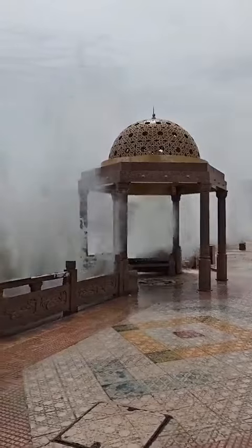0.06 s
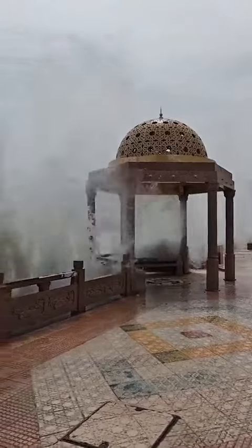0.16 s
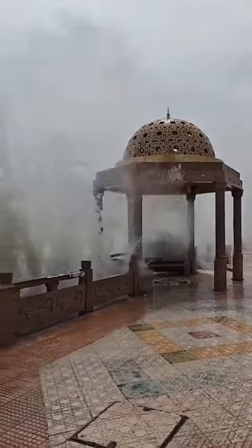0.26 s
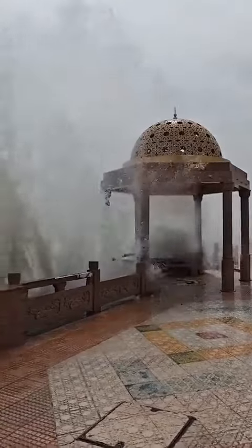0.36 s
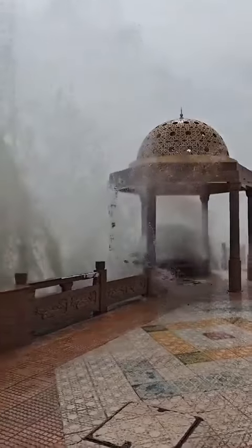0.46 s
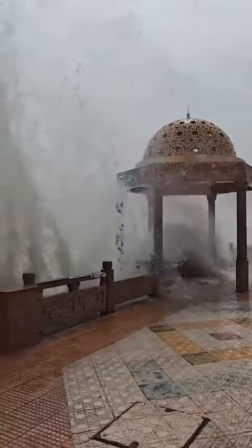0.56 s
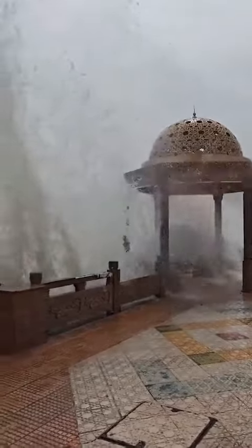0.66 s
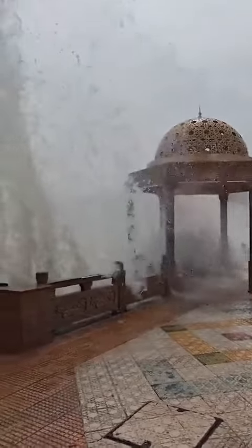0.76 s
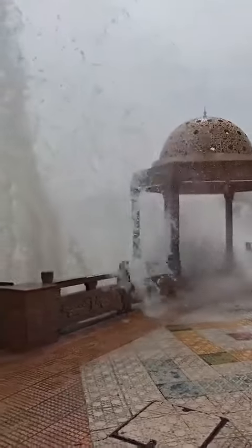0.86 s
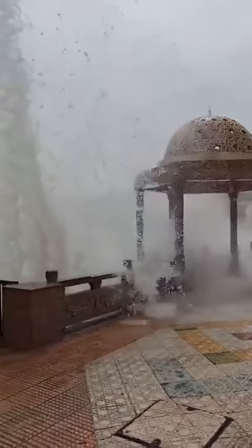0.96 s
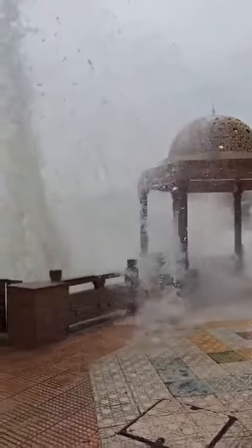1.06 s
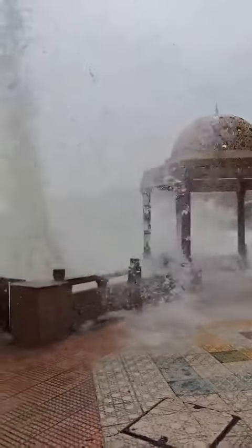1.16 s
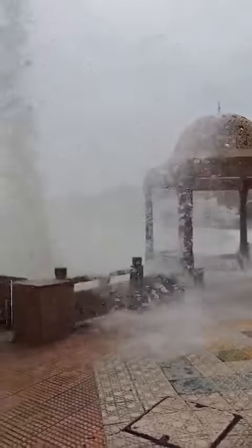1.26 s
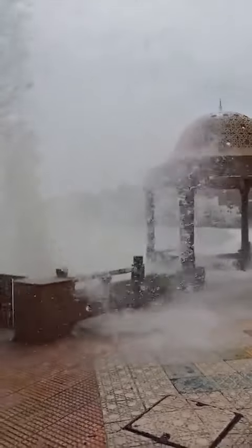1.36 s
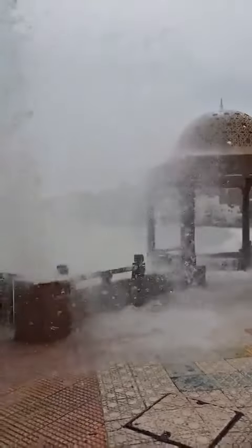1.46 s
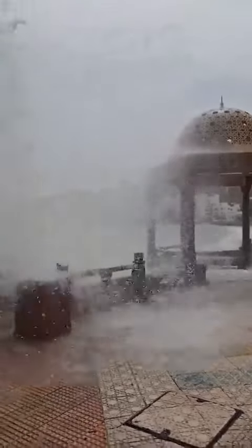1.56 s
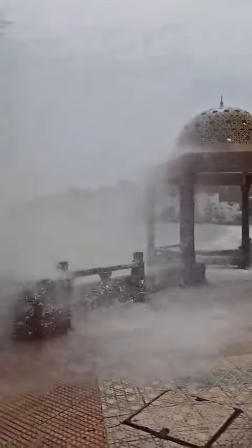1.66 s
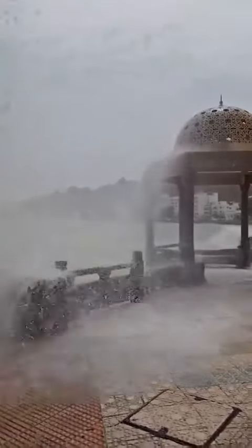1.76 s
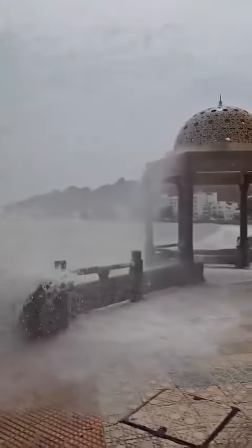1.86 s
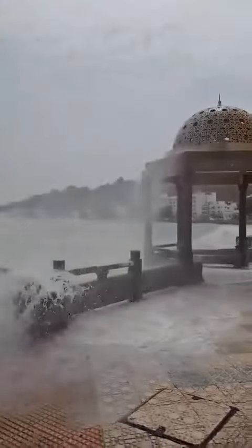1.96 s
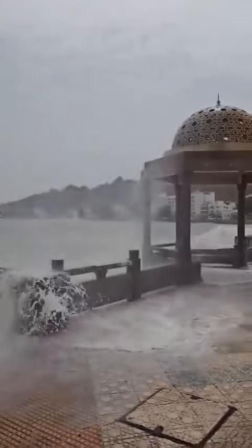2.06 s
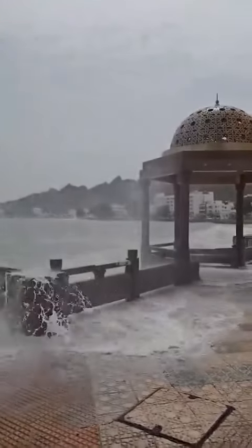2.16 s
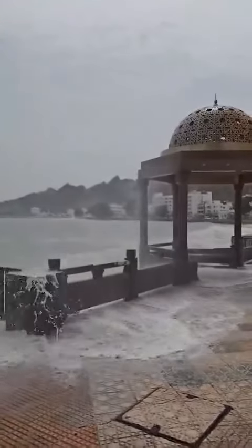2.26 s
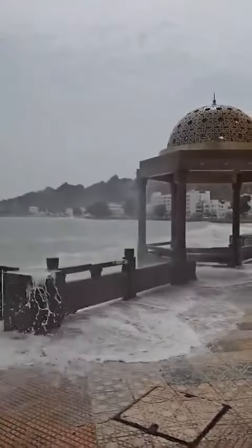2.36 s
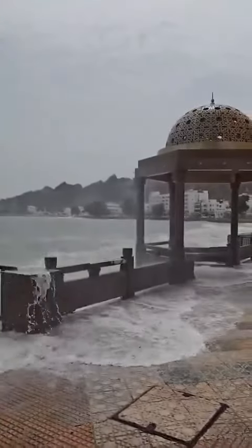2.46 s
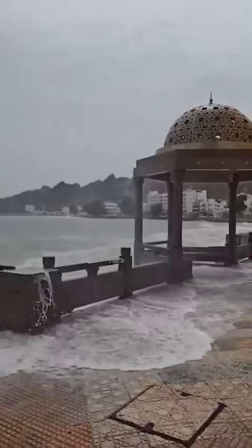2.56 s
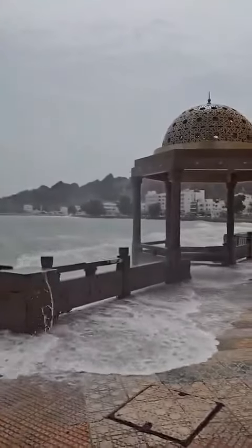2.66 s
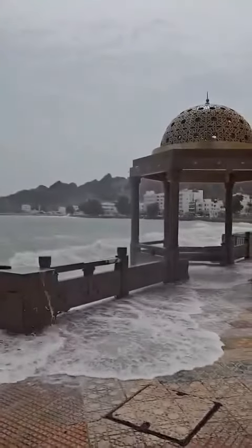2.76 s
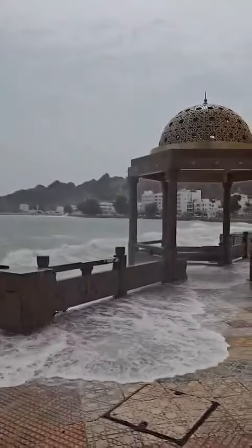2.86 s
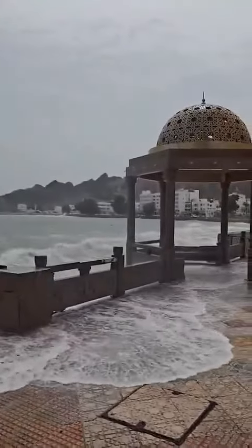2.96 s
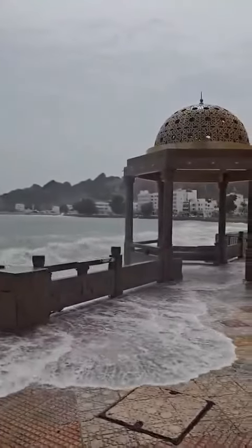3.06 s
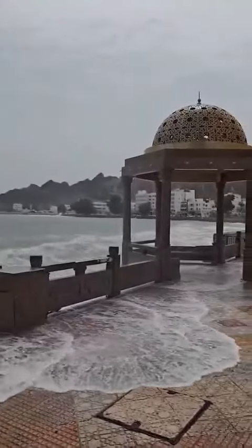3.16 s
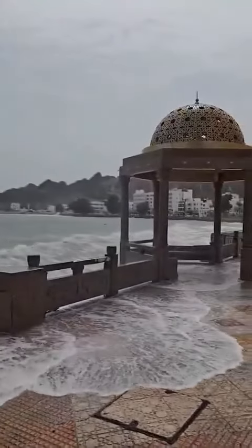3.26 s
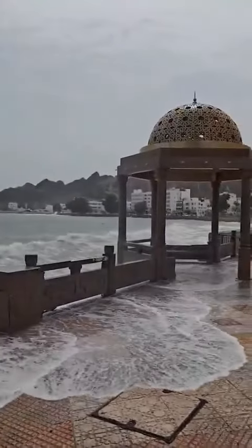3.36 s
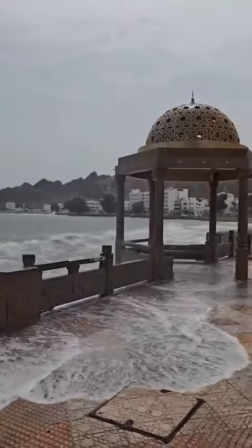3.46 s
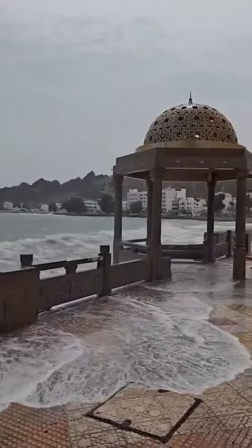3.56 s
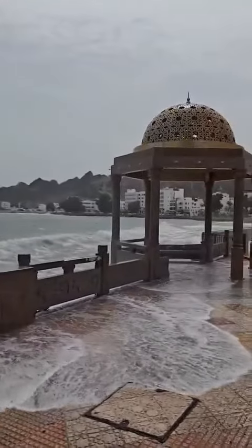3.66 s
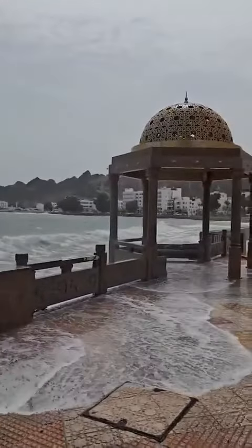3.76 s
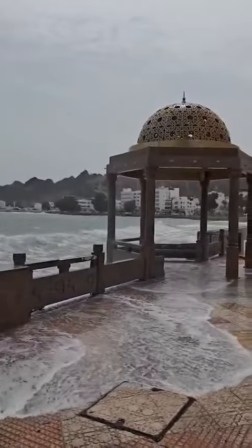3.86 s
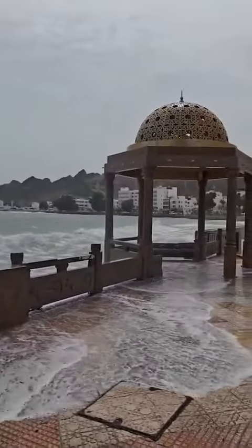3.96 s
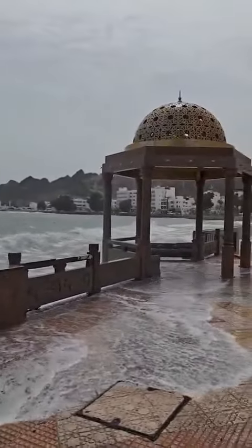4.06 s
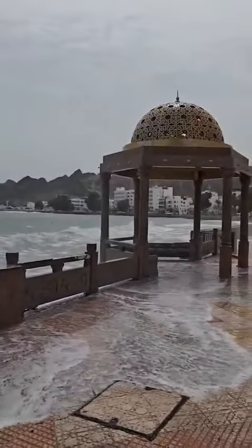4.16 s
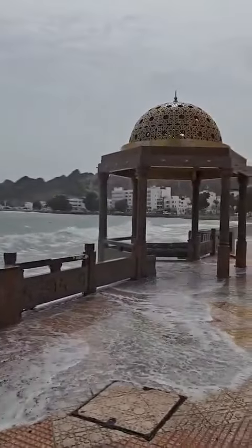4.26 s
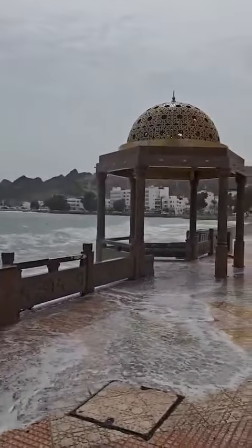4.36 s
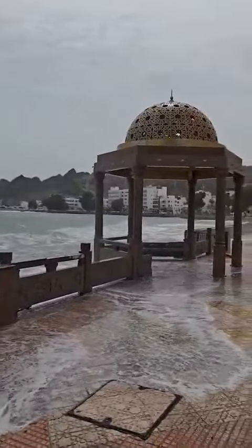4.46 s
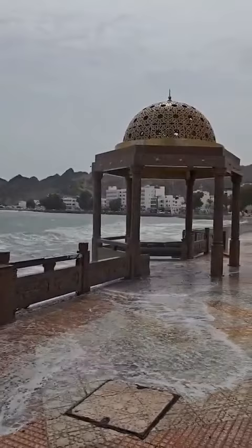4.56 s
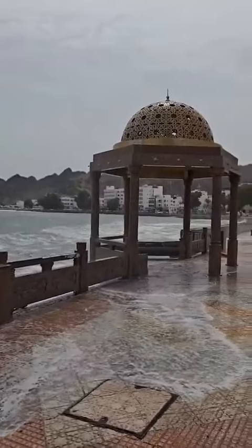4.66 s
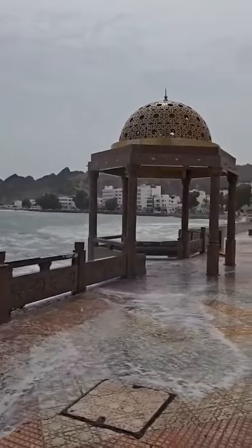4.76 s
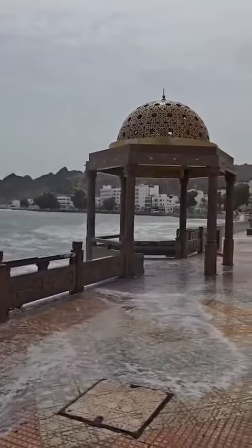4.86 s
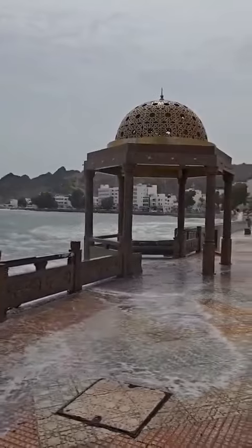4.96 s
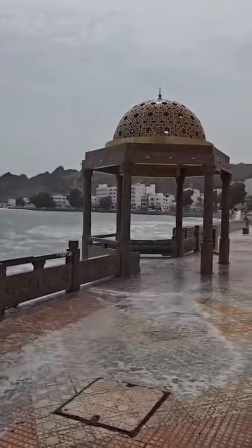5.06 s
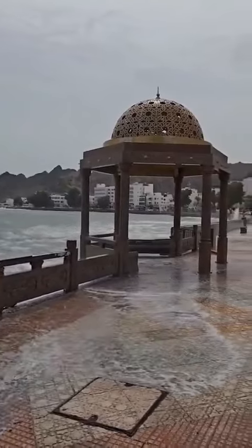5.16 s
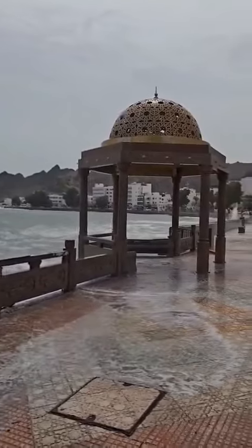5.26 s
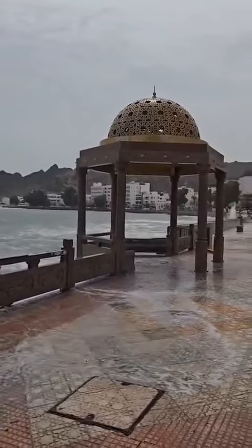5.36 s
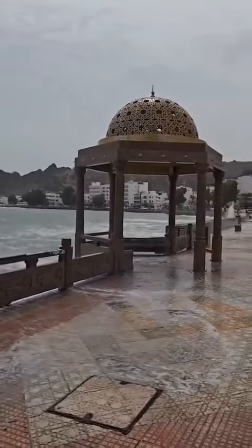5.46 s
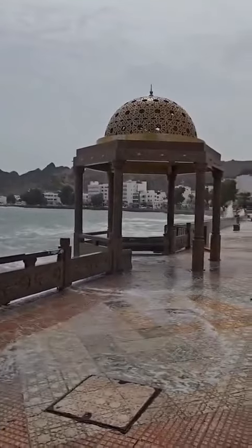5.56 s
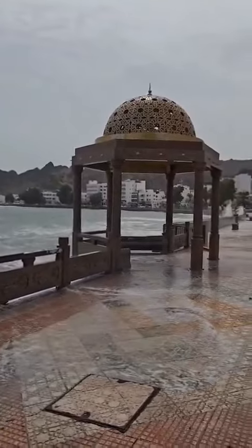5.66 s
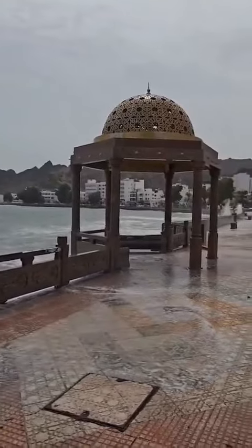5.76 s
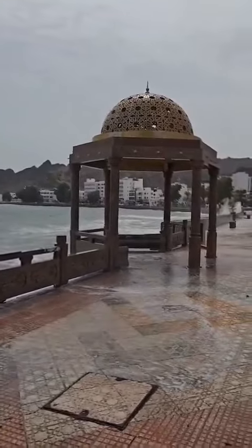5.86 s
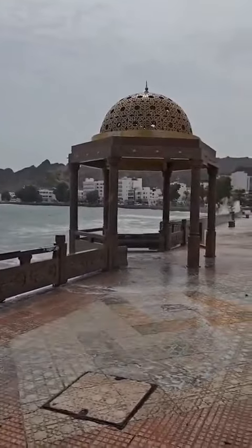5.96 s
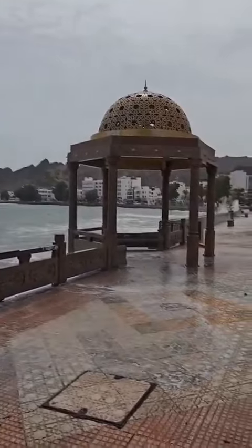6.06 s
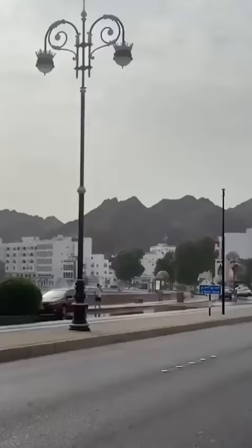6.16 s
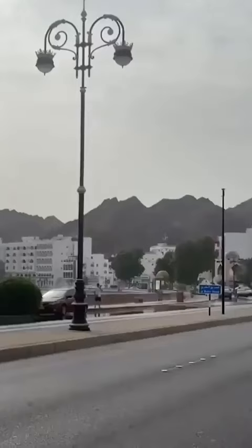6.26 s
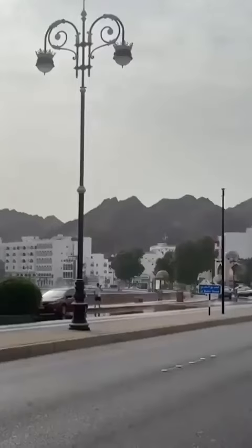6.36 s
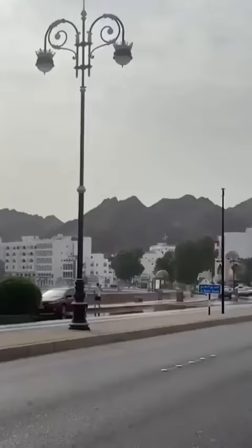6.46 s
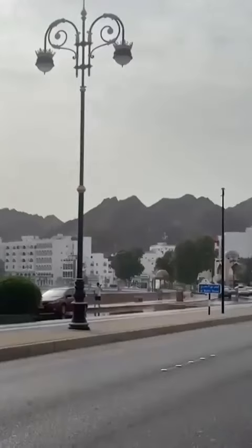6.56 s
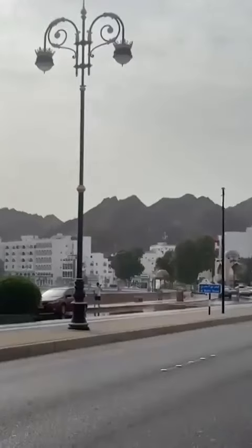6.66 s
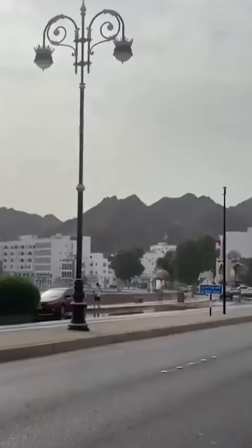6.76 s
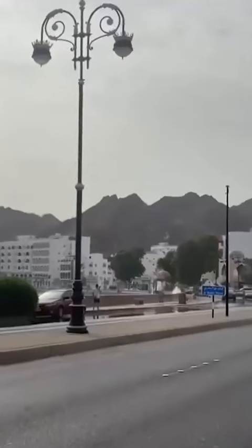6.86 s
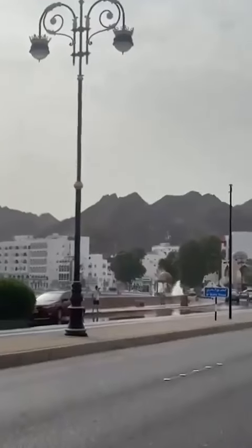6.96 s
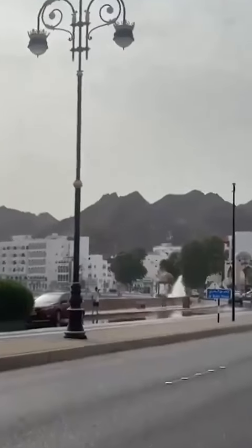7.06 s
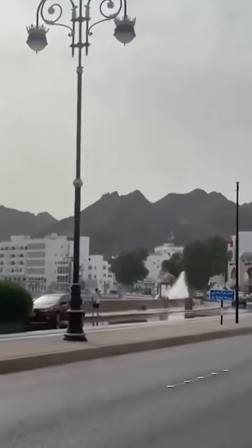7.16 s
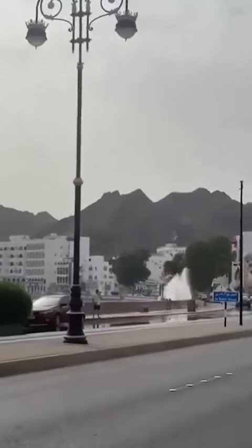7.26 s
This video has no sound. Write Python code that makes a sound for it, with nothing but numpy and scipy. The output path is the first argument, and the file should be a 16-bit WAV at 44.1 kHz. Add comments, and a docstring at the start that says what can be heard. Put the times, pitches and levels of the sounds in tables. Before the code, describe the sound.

A phone stands close to a seawall on a windy promenade. At 0 s a wave is already bursting upward in a broad roar that fades a little until about 0.8 s. Then the water falls: a dense, bright crash with hollow low thuds swells from 0.9 s, heavy water first, fine spray peaking near 2 s, with a wet slap around 1.5 s and others at 2.6 and 2.9 s. Hard wind buffets thump the microphone, strongest from 0.8 to 3.1 s, with a deep hum under the gusts. After 3 s the crash falls off quickly to a softer hiss of foam, bubbling and trickling over paving. A gust thumps at 4.4 s; small glugs come at 3.8 s and between 5 and 6.1 s as the wash slowly swells. Near 6.2 s it cuts to silence. From 6.4 s a dull road rumble continues with faint, distant surf and tyres, swelling briefly around 7.1 s.

```python
"""On a promenade a storm wave bursts over the seawall: it roars, spray rains on the paving, foam fizzes and gurgles.
Water is coloured noise, random impacts and ringing bubbles, with separate thuds, slaps and glugs on top.
Wind is low coloured noise swelling in gusts, with hard buffets of damped tone; a low hum swells with each gust.
After a moment of silence comes the coast road: two dull bands of noise for rumble and for distant surf and tyres."""
import sys
import numpy as np
from scipy import signal
from scipy.fft import rfft, irfft, next_fast_len
from scipy.io import wavfile
from scipy.ndimage import uniform_filter1d

SR = 44100
rng = np.random.default_rng(int(sys.argv[2]) if len(sys.argv) > 2 else 0)


def unload_wav(signal):
    """Save mono or channel-first audio to the path in sys.argv[1] as 16-bit WAV at rate SR, clipped to [-1, 1]."""
    wavfile.write(
        sys.argv[1],
        SR,
        np.round(np.clip(np.atleast_2d(signal).T, -1, 1) * 32767).astype(np.int16),
    )


N = 322767
TIME = np.arange(N) / SR


def undb(db):
    """Amplitude ratio: 20 dB is a factor of ten."""
    return 10 ** (np.asarray(db) / 20)


def curves(table):
    """Linear interpolation in time of each column of a table of (t/s, ..) rows."""
    s, *columns = np.transpose(table)
    return [np.interp(TIME, s, column) for column in columns]


def colour(points, hz):
    """Spectral envelope: (f/Hz, level/dB) points joined on a logarithmic frequency axis."""
    f, db = np.transpose(points)
    return undb(np.interp(np.log(hz), np.log(f), db))


def shape(x, gain):
    """Zero-phase linear filtering: the spectrum is multiplied by a gain that depends on frequency."""
    size = next_fast_len(N, real=True)
    hz = np.maximum(np.arange(size // 2 + 1) * SR / size, 1)
    return irfft(rfft(x, size) * gain(hz), size)[..., :N]


def split(x, hz):
    """Complementary crossover: a steep low band and its remainder add up to the input."""
    low = shape(x, lambda f: 1 / (1 + (f / hz) ** 8))
    return low, x - low


def unit(x):
    """Normalisation: the middle of a stereo pair gets rms 1."""
    return x / np.std(x.mean(axis=0))


def spread(pair, spectrum, width):
    """Mid-side synthesis: two unrelated signals become the coloured middle and side of a stereo pair."""
    mid = shape(pair[0], lambda f: colour(spectrum, f))
    side = shape(pair[1], lambda f: colour(spectrum, f) * colour(width, f))
    return np.array([mid + side, mid - side])


def walk(rate):
    """Random modulation: normal values held for 1 / rate s and smoothed twice, scaled to deviation 1."""
    hold = max(int(SR / rate), 1)
    steps = np.repeat(rng.standard_normal(N // hold + 1), hold)
    y = uniform_filter1d(uniform_filter1d(steps, hold), hold)[:N]
    return y / np.std(y)


def bell(s, half_length):
    """Gaussian envelope, down to 1/e at half_length from its centre."""
    return np.exp(-np.minimum(((TIME - s) / half_length) ** 2, 30))


def arch(s, db, drop_db):
    """Parabolic level in decibels, drop_db below the peak one second to either side."""
    return undb(db - drop_db * (TIME - s) ** 2)


def impacts(rate, scatter_db):
    """Shot noise: drops land at random, most small and a few large, in two unrelated streams."""
    sizes = undb(scatter_db * np.minimum(rng.exponential(size=(2, N)), 5))
    landings = rng.random((2, N)) < rate / SR
    x = landings * sizes * rng.choice([-1, 1], (2, N))
    return x / np.std(x)


def bubbles(low_hz, high_hz, cycles, rise, scatter_db, count):
    """Bubble resonance: trapped air rings as a damped sine, its pitch rising near the surface."""
    out = np.zeros((2, N))
    for when, pitch, size, place in rng.random((count, 4)):
        hz = low_hz * (high_hz / low_hz) ** pitch
        start = int(when * N)
        # age runs from 0 to 1 over the ring, which decays by 40 dB
        age = np.arange(min(int(cycles * SR / hz), N - start)) * hz / SR / cycles
        ring = np.sin(2 * np.pi * cycles * age * (1 + rise * age / 2)) * np.exp(-np.log(100) * age)
        ring *= undb(-scatter_db * np.log(max(size, .02))) * hz / high_hz
        pan = [np.cos(2 * np.pi * place), np.sin(2 * np.pi * place)]
        out[:, start:start + len(age)] += np.outer(pan, ring)
    return out / np.std(out)


# rows of the three level tables: roar of the mass, splashing, fine spray
# burst dying away: (level at 0 s/dB, fade/(dB per s))
BURST_LEVELS = [(-24, 11), (-21, 13.5), (-27.5, 13.5)]
# downpour, heavy water first and spray last:
# (peak t/s, peak level/dB, drop 1 s from peak/dB, attack/(dB per s), release/(dB per s))
DOWNPOUR_LEVELS = [(1.15, -22.5, 1.2, 30.5, 20), (1.76, -18, 3, 33.5, 24.5), (2.0, -19, 5.5, 25, 21)]
# foam sheet hissing past while the sea builds again: (peak t/s, peak level/dB, drop 1 s from peak/dB)
WASH_LEVELS = [(6.9, -29, 0.29), (2.86, -30.5, 0.38), (3.55, -36, 0.87)]
DOWNPOUR_START_S, DOWNPOUR_END_S = 0.83, 3.034
DOWNPOUR_EASE_S = 0.051  # the last water does not all land at once


def water_levels():
    """Power addition of unrelated sources: burst, downpour and foam set the gains of roar, splash and spray."""
    early = np.maximum(DOWNPOUR_START_S - TIME, 0)
    late = DOWNPOUR_EASE_S * np.logaddexp((TIME - DOWNPOUR_END_S) / DOWNPOUR_EASE_S, 0)
    flooded = np.clip((TIME - DOWNPOUR_START_S) / (DOWNPOUR_END_S - DOWNPOUR_START_S), 0, 1) ** 2
    burst = np.array([undb(db - fade * TIME) for db, fade in BURST_LEVELS])
    downpour = np.array([arch(s, db, drop) * undb(-attack * early - release * late)
                         for s, db, drop, attack, release in DOWNPOUR_LEVELS])
    wash = flooded * np.array([arch(*voice) for voice in WASH_LEVELS])
    return np.sqrt(burst ** 2 + downpour ** 2 + wash ** 2)


ECHO_SHIFT_HZ = 2.5  # how fast the echo paths change


def reflections(x, share_db, fade_s, count):
    """Comb interference: early echoes off close surfaces ripple the treble, shifting as the microphone moves."""
    age = TIME[:int(.04 * SR)]
    echoes = rng.standard_normal((count, len(age))) * np.exp(-age / fade_s) * (age > .002)
    echoes *= undb(share_db) / np.linalg.norm(echoes, axis=1, keepdims=True)
    paths = np.array([walk(ECHO_SHIFT_HZ) for _ in echoes])
    paths /= np.linalg.norm(paths, axis=0)  # constant total power
    _, treble = split(x, 600)
    for path, echo in zip(paths, echoes):
        x = x + path * signal.oaconvolve(treble, echo[None], axes=1)[:, :N]
    return x


# brief dips in level within given bands: (t/s, depth/dB, half length/s, lowest f/Hz, highest f/Hz)
BAND_DIPS = [(1.87, 5.5, 0.067, 80, 300), (2.356, 3.5, 0.041, 300, 14000), (3.797, 1.5, 0.052, 700, 9200),
             (5.23, 3, 0.12, 4500, 14000)]
PATCH_DB, PATCH_RATE_HZ = 0.82, 22  # flicker of each band
SURGE_DB, SURGE_RATE_HZ = 0.77, 6  # its slower swells


def patches(x):
    """Independent band modulation: water lands in patches of every size, so each half octave flickers alone."""
    out, octaves = 0, np.arange(0, 7.1, .5)
    for k, hz in enumerate(100 * 2 ** octaves):
        # triangular bands, which sum to the whole
        band = shape(x, lambda f: np.interp(np.log2(f / 100), octaves, np.arange(len(octaves)) == k))
        db = PATCH_DB * walk(PATCH_RATE_HZ) + SURGE_DB * walk(SURGE_RATE_HZ)
        for s, depth, half_length, low, high in BAND_DIPS:
            if low < hz < high:
                db = db - depth * bell(s, half_length)
        out = out + band * undb(db)
    return out


# spectra of the rising burst, the falling wave and the foam sheet: (f/Hz, relative level per Hz/dB)
BURST = [(30, -31), (70, -12), (100, -6.5), (118, -8.5), (188, 1), (241, -8.5), (272, -3.5), (362, -9.5),
         (401, -3.5), (568, -12), (854, -6.5), (1860, -10), (2100, -9.5), (4290, -14), (11400, -26),
         (13200, -33)]
CRASH = [(71, -14.5), (120, -8), (192, 1.5), (321, -2), (423, -2), (614, -8.5), (910, -4), (1320, -5.5),
         (2120, -5), (2680, -8.5), (4480, -12), (7320, -16), (7920, -18), (12400, -20.5), (13200, -21.5)]
WASH = [(71, -15.5), (120, -10), (174, -1), (280, -3.5), (448, -6), (546, -9.5), (705, -6.5), (809, -4.5),
        (1400, -4), (2080, -7.5), (2480, -11.5), (3080, -11), (8730, -21.5), (12400, -24.5), (13200, -29.5)]
# stereo width of the water and of the foam sheet: (f/Hz, side minus mid level/dB)
WATER_WIDTH = [(110, -2.5), (160, -12), (230, -9), (300, -15), (410, -14.5), (560, -6), (650, -3.5),
               (880, -7), (1500, -1.5), (2450, -3.5), (3900, 1), (7300, -.3), (9000, -4.5), (13000, 0)]
WASH_WIDTH = [(110, -2), (170, -8), (280, -16), (460, -10.5), (600, -6), (810, -10), (1300, -6), (1700, -4),
              (4700, 0), (7400, -0.5), (9000, -6.5), (13000, 1)]
# the two ports colour the water a little differently: (f/Hz, left minus right level/dB)
PORT_BALANCE = [(110, -1), (230, -1.3), (450, 1.5), (1000, -1.5), (1400, 0.2), (1900, -2.5), (2900, 0.7),
                (5000, 0.5), (7500, 1), (11000, -0.4)]


def wave():
    """Superposition: countless drops and bubbles merge into noise that bursts up, lands in clumps and drains."""
    roar_gain, splash_gain, spray_gain = water_levels()
    drops = impacts(rate=5000, scatter_db=3.0)
    foam = bubbles(low_hz=596.4, high_hz=9190, cycles=57, rise=0.18, scatter_db=2.0, count=6000)
    gurgle = bubbles(low_hz=169.0, high_hz=1580, cycles=12.2, rise=0.19, scatter_db=-1.0, count=1200)
    trickle = bubbles(low_hz=915, high_hz=5340, cycles=30, rise=0.2, scatter_db=1.5, count=700)
    noise = rng.standard_normal((2, N))
    heavy = noise + undb(-5.5) * drops + undb(-13.5) * foam + undb(-22.0) * gurgle
    shallow = noise + undb(-4.0) * drops + undb(-13.0) * foam + undb(-22.0) * gurgle + undb(-17.0) * trickle
    rising = unit(spread(heavy, BURST, WATER_WIDTH))
    falling = unit(spread(heavy, CRASH, WATER_WIDTH))
    draining = unit(spread(shallow, WASH, WASH_WIDTH))
    toppled = np.interp(TIME, [.45, .95], [0, 1])
    landed = np.interp(TIME, [3., 3.4], [0, 1])
    water = (1 - toppled) * rising + (toppled - landed) * falling + landed * draining
    roar, rest = split(reflections(water, share_db=-11, fade_s=.014, count=4), 700)
    splash, spray = split(rest, 3500)
    # a clump of falling water lifts splash and spray together
    clumps = 0.35 * walk(32)
    roar = unit(roar) * roar_gain * undb(0.8 * walk(20))
    splash = unit(splash) * splash_gain * undb(clumps + 0.4 * walk(60))
    spray = unit(spray) * spray_gain * undb(clumps + 0.35 * walk(90))
    rush = patches(roar + splash + spray)
    # half of the balance to each port, in opposite senses
    return shape(rush, lambda f: colour(PORT_BALANCE, f) ** np.array([[.5], [-.5]]))


# spectrum of the wind's eddies: (f/Hz, relative level per Hz/dB)
EDDY = [(12, -4.5), (25, -1), (55, 5), (85, 0), (130, -7), (250, -24), (600, -50)]
# stereo width of the wind: (f/Hz, side minus mid level/dB)
WIND_WIDTH = [(30, -4), (90, -1.5), (250, -10.5)]


def eddies():
    """Turbulent pressure at the microphone ports: low noise, its slow swings evened out."""
    x = spread(rng.standard_normal((2, N)), EDDY, WIND_WIDTH)
    return x / np.sqrt(uniform_filter1d(np.mean(x ** 2, axis=0), int(.06 * SR)))


# gusts on the microphone, which also drive the hum:
# (peak t/s, half length/s, relative rumble level/dB, relative hum level/dB)
GUSTS = [(.81, .04, -44, -27), (.895, 0.052, -31, -17), (1.18, 0.07, -43, -29), (1.74, 0.13, -36.5, -35),
         (2.157, 0.14, -35, -22.5), (2.335, 0.061, -25.5, -19), (2.62, 0.22, -30.5, -31.5),
         (2.87, 0.11, -28.5, -16.5), (3.06, 0.093, -32.5, -22), (3.28, .04, -48, -32),
         (3.69, .05, -53, -29.5), (3.905, 0.09, -46, -28.5), (4.228, .025, -55, -29),
         (4.365, 0.054, -33, -23), (5.103, 0.5, -40.5, -30.5), (5.998, 0.33, -40.5, -29.5)]
# spectrum of the flutter: (f/Hz, relative level per Hz/dB)
FLUTTER = [(40, -15), (110, 2.5), (170, 1), (260, -9.5), (500, -32), (1200, -53.5)]
BREEZE_DB = -49.5  # on the scale of the gusts' rumble
GUST_FLUTTER_DB = -4.5  # flutter relative to the gusts' rumble column
BUFFET_SEAWARD_DB = 4.5  # extra left minus right level of buffets and flutter


def wind():
    """Amplitude modulation by the flow: gusts rumble and flutter over a breeze, with short hard buffets."""
    gusts = sum(undb(db) * bell(s, half_length) for s, half_length, db, _ in GUSTS)
    rumble = eddies() * (undb(BREEZE_DB) + gusts) * undb(7.0 + 1.4 * walk(12))
    thumps, strength = buffets()
    # hard wind tears off smaller eddies, which flutter higher up
    flutter = unit(spread(rng.standard_normal((2, N)), FLUTTER, WIND_WIDTH))
    hard = thumps + flutter * (strength + undb(GUST_FLUTTER_DB) * gusts)
    return rumble + hard * undb([[BUFFET_SEAWARD_DB / 2], [-BUFFET_SEAWARD_DB / 2]])


HUM_HZ, HUM_LAG_S = 44.2, .01
HUM_REST_DB = -43  # on the scale of the gusts' hum column
HUM_SWAY_RAD = 0.31  # the phase wanders this far at each port, in opposite senses


def hum():
    """Wind-driven tone: a deep steady pitch swells with each gust, perhaps a hollow the wind blows across."""
    swell = sum(undb(db) * bell(s + HUM_LAG_S, half_length) for s, half_length, _, db in GUSTS)
    phase = 2 * np.pi * np.cumsum(HUM_HZ + .15 * walk(3)) / SR
    level = (undb(HUM_REST_DB) + swell) * undb(-0.5 + 1.46 * walk(12))
    sway = HUM_SWAY_RAD * walk(7.5)
    return np.sqrt(2) * np.sin([phase + sway, phase - sway]) * level


def cavities(table, rough_rad, rise_per_s):
    """Cavity resonance: large pockets of trapped air ring unsteadily; returns sound and joint level."""
    sound, strength = np.zeros((2, N))
    wobble = rough_rad * walk(130)
    for s, db, hz, half_length in table:
        near = np.abs(TIME - s) < .15
        age = TIME[near] - s
        swell = undb(db) * np.exp(-(age / half_length) ** 2)
        sound[near] += swell * np.sin(2 * np.pi * hz * age * (1 + rise_per_s * age / 2) + wobble[near])
        strength[near] += swell
    return sound, strength


# masses of water slumping onto the paving: (t/s, peak level/dB, f/Hz, half length/s)
SLUMPS = [(.70, -20, 411, 0.034), (.71, -23, 200, 0.03), (.90, -20, 240, .03), (.918, -15.5, 158, .028),
          (1.035, -18.5, 264, 0.034), (1.10, -16, 330, 0.018), (1.15, -19.5, 180, 0.037),
          (1.44, -18.5, 335, 0.032), (1.635, -17, 190, 0.026), (2.0, -27, 264, 0.022),
          (2.07, -20, 242, 0.057), (2.21, -18.5, 286, 0.03), (2.395, -26, 185, 0.022),
          (2.46, -18.5, 161, 0.023), (2.55, -21, 150, .025), (2.64, -22, 204.5, 0.076),
          (2.74, -19.5, 375, 0.058), (2.858, -21.5, 145, .022), (2.915, -20, 252, 0.028),
          (3.05, -22.5, 238, 0.028)]
SLUMP_ROUGH_RAD = 1.0
SLUMP_SPLASH_DB = -14.5  # spatter relative to the thuds' envelope


def slumps():
    """Air entrainment: heavy water traps air in a hollow thud and throws up a spatter of drops."""
    thuds, strength = cavities(SLUMPS, SLUMP_ROUGH_RAD, 0)
    spatter = unit(spread(impacts(rate=3000, scatter_db=2.0), CRASH, WATER_WIDTH))
    return thuds + undb(SLUMP_SPLASH_DB) * strength * spatter


# single hard buffets: (t/s, relative thump level/dB, f/Hz, length/s, relative flutter level/dB)
BUFFETS = [(0.845, -17, 74, 0.073, -22), (0.891, -13, 66, 0.094, -15.5), (1.131, -14, 74.6, 0.028, -24),
           (1.71, -11.5, 65, 0.03, -26), (1.81, -15.5, 48, 0.042, -37), (2.063, -22, 55, 0.12, -24),
           (2.167, -15, 70, 0.059, -28), (2.221, -19, 59.6, 0.037, -34), (2.303, -19, 48.7, 0.071, -30),
           (2.371, -17.5, 61.6, 0.055, -21), (2.487, -20, 80.6, .035, -28),
           (2.595, -12.5, 65.4, 0.055, -24), (2.738, -20.5, 78, .035, -32), (2.836, -15, 66, 0.06, -22.5),
           (3.05, -26, 81, 0.03, -33), (3.122, -16, 55.3, 0.027, -27), (4.328, -24.5, 64, .035, -33),
           (4.365, -13.5, 64, 0.038, -24), (5.008, -17, 65.5, 0.042, -31), (5.264, -16.5, 66, 0.031, -36)]


def buffets():
    """Damped oscillation: a hard eddy shoves the air, left port first; returns thumps and flutter level."""
    thumps, strength = np.zeros((2, 2, N))
    for s, db, hz, length, flutter_db in BUFFETS:
        age = np.maximum(TIME - s - np.array([[0], [.002]]), 0)
        swell = age / (length / 5) * np.exp(1 - age / (length / 5))  # peaks after a fifth of the length
        thumps += undb(db) * swell * np.sin(2 * np.pi * hz * age)
        strength += undb(flutter_db) * swell
    return thumps, strength


# sheets of water slapping the paving: (t/s, peak level/dB, centre f/Hz, length/s)
SLAPS = [(1.49, -20, 2800, 0.12), (2.602, -20.5, 1200, .1), (2.899, -24, 3000, 0.075),
         (4.465, -33, 1500, 0.04), (5.52, -35, 900, 0.073)]


def slaps():
    """Band-limited shot noise: a sheet of water lands flat in a quick, coarse splash that dies away."""
    out = 0
    drops = spread(impacts(rate=2500, scatter_db=1.5), WASH, WASH_WIDTH)
    for s, db, hz, length in SLAPS:
        age = np.maximum(TIME - s, 0) / (length / 4)  # peaks after a quarter of the length
        splash = unit(shape(drops, lambda f: 1 / (1 + np.log2(f / hz) ** 4)))
        out = out + undb(db) * age * np.exp(1 - age) * splash
    return out


# hollow gurgles as the water drains: (t/s, peak level/dB, f/Hz, half length/s)
GURGLES = [(3.805, -23, 192, 0.017), (4.64, -31, 1310, 0.029), (5.02, -27, 211, 0.044),
           (5.535, -26.5, 718, 0.019), (5.575, -25.5, 292.4, 0.063), (5.71, -28, 275, 0.038),
           (5.97, -28, 240, .03), (6.08, -28, 285, 0.032)]
GURGLE_ROUGH_RAD, GURGLE_RISE_PER_S = 0.68, 1


def gurgles():
    """Rising cavity resonance: the draining sheet swallows air in short glugs."""
    return cavities(GURGLES, GURGLE_ROUGH_RAD, GURGLE_RISE_PER_S)[0]


# levels on the coast road: (t/s, rumble level/dB, distant surf and tyres level/dB)
ROAD = [(6.36, -28, -33.5), (6.97, -29, -35), (7.07, -25, -35.5), (7.32, -30.5, -36)]
# its spectrum: (f/Hz, relative level per Hz/dB)
ROAD_COLOUR = [(13, -35.5), (22, -21), (49, -0.5), (132, -8.5), (186, -11.5), (277, -13), (360, -20.5),
               (610, -27.5), (753, -27.5), (1240, -26.5), (1530, -31), (2470, -35), (3130, -45.5),
               (5440, -52.5), (12000, -65.5), (15600, -101), (22000, -120)]
# its stereo width: (f/Hz, side minus mid level/dB)
ROAD_WIDTH = [(280, -56), (450, -13), (700, -2), (1350, -4.5), (1700, -44), (4500, -49), (6000, -8),
              (9000, -6), (12000, -25)]
ROAD_TOP_HZ = 12100


def road():
    """Two-band noise: wind and engines rumble below the distant wash of surf and tyres."""
    rumble_db, surf_db = curves(ROAD)
    rumble, surf = split(spread(rng.standard_normal((2, N)), ROAD_COLOUR, ROAD_WIDTH), 400)
    surf = shape(surf, lambda f: f < ROAD_TOP_HZ)
    rumble = unit(rumble) * undb(rumble_db + 0.64 * walk(13.0))
    return rumble + unit(surf) * undb(surf_db + 0.22 * walk(24))


SHORE_END_S, ROAD_START_S = 6.176, 6.363
SEAWARD_DB = 1.5  # left minus right level of wind and hum: the left port faces the wind


def scene():
    """Linear superposition of sources: the promenade, a moment of silence, the coast road."""
    shore_fade = np.exp(-np.maximum(TIME - SHORE_END_S, 0) / 0.006)
    road_fade = np.exp(np.minimum(TIME - ROAD_START_S, 0) / 0.0004)
    ports = undb([[SEAWARD_DB / 2], [-SEAWARD_DB / 2]])
    water = wave() + slumps() + slaps() + gurgles()
    air = (wind() + hum()) * ports
    return (water + air) * shore_fade + road() * road_fade


TOP_HZ = 13200


def record(dry):
    """Saturation and band limiting: the phone clips at full scale, then a steep low-pass cuts the top."""
    low_pass = signal.ellip(12, .2, 80, TOP_HZ, fs=SR, output="sos")
    return signal.sosfilt(low_pass, np.clip(dry, -1, 1))


dry = scene()
out = record(dry)
unload_wav(out)
```